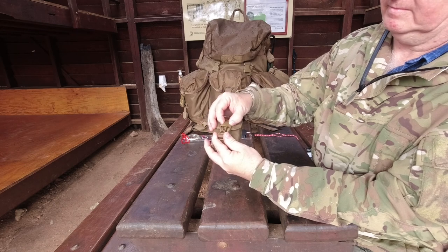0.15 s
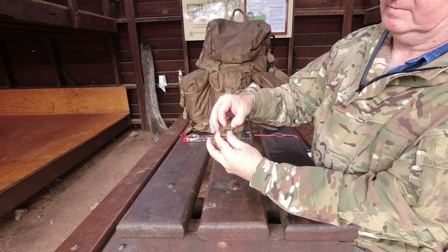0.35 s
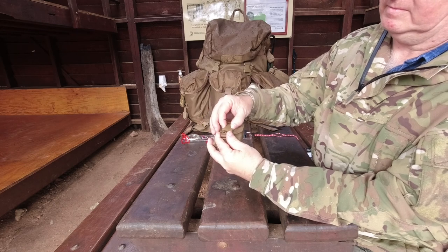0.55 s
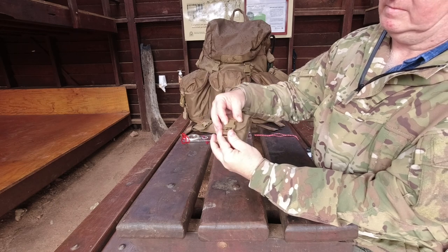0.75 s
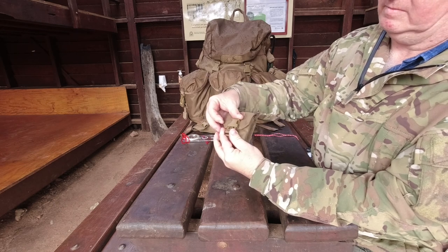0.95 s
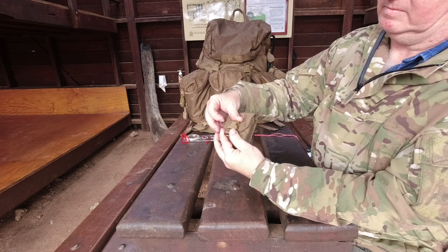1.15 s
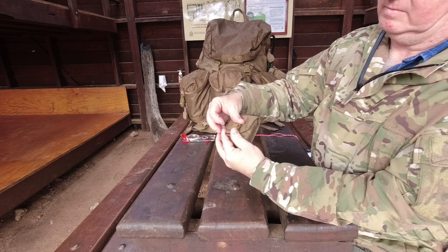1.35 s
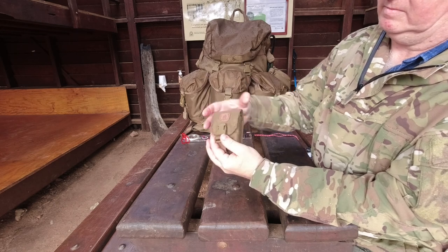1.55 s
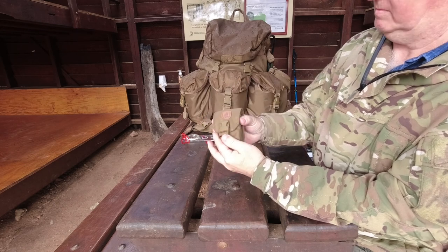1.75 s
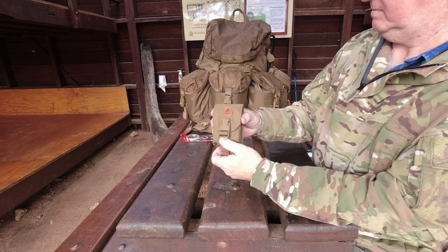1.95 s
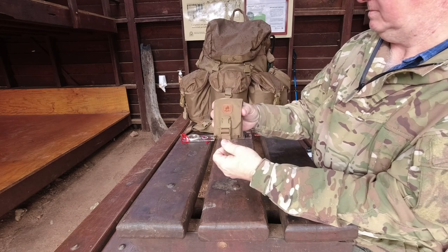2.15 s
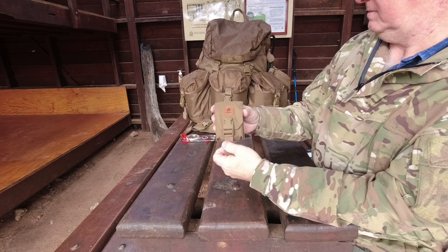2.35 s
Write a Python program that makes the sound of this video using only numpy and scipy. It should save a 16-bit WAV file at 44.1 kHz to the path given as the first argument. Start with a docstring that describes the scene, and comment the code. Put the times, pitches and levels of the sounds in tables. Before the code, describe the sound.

A plastic buckle snaps shut with one loud sharp click after soft nylon rustling and small ticks

```python
"""Hands fold the flap of a nylon pouch over a table in a small wooden shelter, over low outdoor rumble and faint air.
From the start the cloth rubs in short strokes (dense grains); in the first half second plastic buckle halves tick
(ring, knock, rattle) and fingers bump the padded pouch (damped noise). One more tick comes near 1.1 s. Near 1.4 s
the buckle snaps shut (modes on a crack) and the plank walls ring (fading noise). Fainter strokes follow, with two
ticks and a bump near 2.3 s."""
import sys
import numpy as np
from scipy import signal
from scipy.fft import rfft, irfft, next_fast_len
from scipy.io import wavfile
from scipy.ndimage import uniform_filter1d

SR = 44100
rng = np.random.default_rng(int(sys.argv[2]) if len(sys.argv) > 2 else 0)


def generate_wav(signal):
    """Clip the signal to [-1, 1] and save it as 16-bit WAV at the path in sys.argv[1]."""
    frames = np.transpose(np.atleast_2d(signal))
    scaled = np.clip(frames, -1, 1) * 32767
    pcm = np.round(scaled).astype(np.int16)
    wavfile.write(sys.argv[1], SR, pcm)


N = 105795


def undb(db):
    """Decibels to amplitude gain."""
    return 10 ** (np.asarray(db) / 20)


def unit(x):
    """Scale to an energy of one."""
    return x / np.sqrt(np.sum(x ** 2, axis=-1, keepdims=True))


def stereo(mid, side, side_db):
    """Mid plus side, the side with opposite sign at each ear."""
    return mid + undb(side_db) * side * np.array([[1], [-1]])


def colour(x, points):
    """Causal minimum-phase filter through (frequency [Hz], gain [dB]) points."""
    size = 2 * next_fast_len(N)
    hz, db = np.array(points, float).T
    log_hz = np.log(np.fft.rfftfreq(size, 1 / SR) + 1)
    cepstrum = irfft(np.interp(log_hz, np.log(hz), np.log(undb(db))))
    # fold the cepstrum onto positive time
    cepstrum[1:size // 2] *= 2
    cepstrum[size // 2 + 1:] = 0
    return irfft(rfft(x, size) * np.exp(rfft(cepstrum)))[..., :N]


def fade(t60_s):
    """Exponential decay, 60 dB down after t60_s."""
    return np.exp(-np.minimum(np.log(1000) * np.arange(N) / SR / t60_s, 60))


def ring(hz, t60_s):
    """One struck mode: a decaying cosine."""
    return np.cos(2 * np.pi * hz * np.arange(N) / SR) * fade(t60_s)


def at(x, time_s):
    """Delay a sound to its moment."""
    return np.concatenate([np.zeros(max(int(time_s * SR), 0)), x])[:N]


def wander(size, count):
    """Smooth random values of spread one, new about every count steps."""
    return uniform_filter1d(rng.standard_normal(size), count) * np.sqrt(count)


def burst(envelope):
    """Rattle of micro-contacts: enveloped noise, spectrum evened out, then shaped again."""
    x = rng.standard_normal(N) * envelope
    spectrum = rfft(x)
    magnitude = np.abs(spectrum)
    even = irfft(spectrum / (magnitude + .3 * magnitude.mean()), N)
    return unit(even * envelope ** .25)


def noise(points, side_db):
    """Coloured stereo noise, mid and side each of rms one before side_db."""
    mid, side = unit(colour(rng.standard_normal((2, N)), points)) * np.sqrt(N)
    return stereo(mid, side, side_db)


def cut_treble(x):
    """Steep low-pass near 5.1 kHz, plus a faint skirt of treble up to about 6.3 kHz."""
    edge = signal.butter(20, 5120, fs=SR, output="sos")
    skirt = signal.butter(5, 6300, fs=SR, output="sos")
    return signal.sosfilt(edge, x) + undb(-25.5) * signal.sosfilt(skirt, x)


# spectrum of the outdoor air: (frequency [Hz], relative level [dB])
AIR_SPECTRUM = [(200, 9), (400, 7), (800, 4), (1700, -3.5), (5400, -8.5), (7000, -16.5), (9000, -27.5),
                (15000, -36)]
# spectrum of the outdoor rumble: (frequency [Hz], relative level [dB])
RUMBLE_SPECTRUM = [(15, -1), (30, -5), (50, 2.5), (80, 1), (125, 0), (170, -5), (240, -18), (400, -20),
                   (900, -68)]
# course of the rumble: (time [s], level [dB])
RUMBLE_COURSE = [(0, -61.5), (.45, -58), (.9, -59), (1.35, -62.5), (1.85, -68), (2.099, -72), (2.35, -67.5)]
AIR_DB = -78.5


def background():
    """Low rumble noise of changing level, and faint steady air noise."""
    rumble_db = np.interp(np.arange(N) / SR, *np.array(RUMBLE_COURSE).T)
    rumble = undb(rumble_db) * noise(RUMBLE_SPECTRUM, side_db=-15.5)
    return rumble + undb(AIR_DB) * noise(AIR_SPECTRUM, side_db=-3)


# strokes of nylon on nylon: (peak time [s], rise to peak from 1/e [s], fall to 1/e [s], swish level [dB],
# dull rub re swish [dB], thin scrape re swish [dB])
CLOTH_STROKES = [(0.017, 0.086, 0.06, -63.5, -3, -6), (.18, 0.036, 0.037, -64, -2, -4.5),
                 (.228, 0.03, 0.02, -60.5, 2, -3.5), (0.469, 0.028, 0.017, -65.5, 0.5, 7.5),
                 (0.661, 0.025, 0.023, -65, -4, 1.5), (.79, 0.14, 0.13, -63.5, -8, -19),
                 (0.911, 0.038, 0.043, -60, -8.5, -9), (1.03, 0.047, 0.072, -62, -14.5, -9.5),
                 (1.094, 0.015, 0.029, -59.5, -11, -9.5), (1.203, 0.033, 0.035, -59.5, -13.5, -5.5),
                 (1.298, 0.031, 0.25, -74, -7, 1.5), (1.819, 0.03, 0.088, -75, -6, -5),
                 (1.94, 0.026, 0.029, -76.5, -3, -1.5), (2.169, 0.021, 0.024, -73, -12, -1),
                 (2.227, 0.024, 0.026, -67.5, -10, -8.5), (2.292, 0.033, 0.033, -67.5, -7, -4)]
# spectra of swish, rub and scrape before cut_treble(): (frequency [Hz], relative level [dB])
SWISH_SPECTRUM = [(200, -6), (800, -15), (1500, -7.5), (1850, 4), (2300, 4), (3300, -0.5), (5000, -7.5),
                  (8000, -10.5)]
RUB_SPECTRUM = [(100, -5.5), (220, -1), (420, 2), (750, 4), (1100, -1.5), (1500, 3), (2500, -15.5)]
SCRAPE_SPECTRUM = [(1500, -33), (2900, -9.5), (3600, -1.5), (4900, -6.5), (6500, -10.5)]
GRAINS_PER_S, GRAIN_SPREAD_DB = 2700, -1
CATCHES_PER_S, CATCH_DB = 160, 1.6


def cloth():
    """Threads catch and slip in dense tiny grains; each stroke swells and dies with its own mix."""
    t = np.arange(N) / SR
    powers = []
    for peak_s, rise_s, fall_s, db, _, _ in CLOTH_STROKES:
        width_s = np.where(t < peak_s, rise_s, fall_s)
        powers.append(undb(db) ** 2 * np.exp(-2 * ((t - peak_s) / width_s) ** 2))
    powers = np.array(powers)
    shares = undb([(0, rub_db, scrape_db) for *_, rub_db, scrape_db in CLOTH_STROKES]).T
    out = 0
    for share, spectrum in zip(shares, (SWISH_SPECTRUM, RUB_SPECTRUM, SCRAPE_SPECTRUM)):
        struck = rng.random(N) < GRAINS_PER_S / SR
        sign = rng.choice([-1, 1], N)
        size = undb(GRAIN_SPREAD_DB * np.minimum(rng.exponential(size=N), 5))
        texture = unit(cut_treble(colour(struck * sign * size, spectrum)))
        out = out + np.sqrt(share ** 2 @ powers * N) * texture
    catches = uniform_filter1d(wander(N, int(SR / CATCHES_PER_S)), size=64)
    return out * undb(CATCH_DB * catches)


def near(x, side_db):
    """Direct sound, its scatter off hands and table, and one thin, slightly smeared echo."""
    # burst() reshapes both fades
    scatter = signal.fftconvolve(x, at(burst(fade(0.0072)), .0006))[:N]
    echo = signal.fftconvolve(x, at(burst(fade(.003)), .0108))[:N]
    echo = signal.sosfilt(signal.butter(1, 1400, "high", fs=SR, output="sos"), echo)
    return stereo(x, scatter, side_db) + undb(-10.5) * echo


# bands of the plank walls: (frequency [Hz], decay t60 [s], relative level [dB])
WALL_BANDS = [(150, .3, -10), (500, 0.41, -5.5), (1400, 0.38, 1), (2610, .39, -3.5), (3750, 0.3, -3.5),
              (4600, .33, 0.5), (5390, 0.35, 1), (7700, 0.31, 7), (9300, .28, 4.5), (10700, 0.25, -3),
              (15000, 0.28, -3)]
WALL_DELAY_S, BUILD_S, PATCHY_DB = 0.0045, 0.028, 2


def shelter(side_db=-3.0):
    """Plank reflections thicken, then die band by band, unevenly over pitch and differently at each ear."""
    t = np.arange(N) / SR
    log_hz = np.log(np.fft.rfftfreq(N, 1 / SR) + 1)
    spectrum = rfft(rng.standard_normal((2, N))) * undb(PATCHY_DB * wander(len(log_hz), count=200))
    centres = np.log([row[0] for row in WALL_BANDS])
    tail = 0
    # each unit vector gives one triangular band
    for (_, t60_s, db), band in zip(WALL_BANDS, np.eye(len(WALL_BANDS))):
        banded = irfft(spectrum * np.interp(log_hz, centres, band), N)
        tail = tail + undb(db) * fade(t60_s) * banded
    mid, side = tail * np.sqrt(np.clip((t - WALL_DELAY_S) / BUILD_S, 0, 1))
    return unit(stereo(mid, side, side_db))


def place(x, walls, wet_db, side_db):
    """Close sound plus the shelter's ring by convolution."""
    wet = signal.fftconvolve(x[None], walls, axes=1)[:, :N]
    return near(x, side_db) + undb(wet_db) * wet


# buckle halves touching, before cut_treble(): (time [s], ring level [dB], ring frequency [Hz], ring t60 [s],
# dull knock re ring [dB], bright rattle re ring [dB])
BUCKLE_TICKS = [(0.0395, -33, 3500, 0.0053, -2, -10), (0.211, -31, 4380, 0.005, -0.5, -5),
                (.2168, -35, 3600, 0.0072, 8, -4), (.2266, -21, 3470, 0.0076, -11, -13),
                (.2285, -18, 3484, 0.022, -4, -11.5), (0.23, -24, 3460, 0.018, -9.5, -12),
                (.2375, -33.5, 3570, 0.013, -11, -12), (.271, -35, 3506, 0.062, -24, -21),
                (0.4341, -31, 3960, 0.0081, -20, -0.5), (0.455, -32, 3870, 0.005, -13, 5),
                (.459, -27, 3700, 0.0071, -14, -6), (0.4624, -21, 3740, 0.01, -17, -12),
                (0.4734, -24, 3600, 0.013, -11, -7), (1.0881, -34, 4313, 0.0082, -4.5, -5),
                (2.226, -34, 2200, 0.007, -2.5, -10), (2.2275, -33, 2600, .007, -5.5, -9)]
# spectrum of the dull knock: (frequency [Hz], gain [dB])
KNOCK_SPECTRUM = [(100, -9), (400, 5.5), (900, -5.5), (1900, 9.5), (3000, -4.5), (4900, -8), (7000, -9.5)]
# spectrum of the bright rattle: (frequency [Hz], relative level [dB])
RATTLE_SPECTRUM = [(1500, -23), (2900, -9), (3800, 0), (4600, 3), (5400, -4.5), (7000, -6)]


def ticks():
    """Light plastic contacts: one ring that depends on the grip, a dull knock and a bright rattle."""
    contact_fade = fade(0.0078)  # reshaped by burst()
    rings, knocks, rattles = 0, 0, 0
    for time_s, db, hz, t60_s, knock_db, rattle_db in BUCKLE_TICKS:
        rings = rings + undb(db) * at(unit(ring(hz, t60_s)), time_s)
        knocks = knocks + undb(db + knock_db) * at(burst(contact_fade), time_s)
        rattle = unit(colour(burst(contact_fade), RATTLE_SPECTRUM))
        rattles = rattles + undb(db + rattle_db) * at(rattle, time_s)
    return cut_treble(rings + colour(knocks, KNOCK_SPECTRUM) + rattles)


# fingers bumping the padded pouch: (time [s], level [dB], centre frequency [Hz])
POUCH_BUMPS = [(0.228, -34.5, 414), (0.436, -36, 724), (.456, -31, 697), (.474, -31, 677),
               (0.487, -37, 340), (2.309, -40, 419)]
BUMP_T60_S, BUMP_WIDTH = .11, .45


def bumps():
    """Damped thuds of the pouch body: fading noise through a twice-applied band-pass."""
    out = 0
    edge = 1 + BUMP_WIDTH / 2
    for time_s, db, hz in POUCH_BUMPS:
        body = signal.butter(1, [hz / edge, hz * edge], "band", fs=SR, output="sos")
        blow = rng.standard_normal(N) * fade(BUMP_T60_S)
        thud = unit(signal.sosfilt(np.vstack([body, body]), blow))
        out = out + undb(db) * at(thud, time_s)
    return out


# modes of the closing buckle: (frequency [Hz], relative level [dB], t60 [s])
BUCKLE_MODES = [(1300, -8, 0.0052), (3782, 5.5, 0.012), (4880, 3, 0.008), (5390, 1, 0.0076),
                (6240, -11, 0.013), (7920, -12.5, 0.011), (10540, 1, 0.009)]
# spectrum of its crack: (frequency [Hz], relative level [dB])
CRACK_SPECTRUM = [(100, -5.5), (400, -4), (1100, -5), (2000, -2.5), (3000, -3), (4400, 2), (5400, 3),
                  (7000, -4.5), (8700, -3.5), (9800, 6), (11200, 6), (12500, 1), (15500, -1)]
RING_DB, CRACK_DB = 0, -2.5


def buckle(x):
    """The buckle's answer to a blow: short plastic modes standing on a broad crack."""
    hz = np.fft.rfftfreq(N, 1 / SR) + 1
    mode_power = 0
    for mode_hz, db, t60_s in BUCKLE_MODES:
        half_width_hz = np.log(1000) / (2 * np.pi * t60_s)
        mode_power = mode_power + undb(db) ** 2 / t60_s / ((hz - mode_hz) ** 2 + half_width_hz ** 2)
    crack_hz, crack_db = np.array(CRACK_SPECTRUM).T
    crack = undb(np.interp(np.log(hz), np.log(crack_hz), crack_db))
    gain = np.hypot(undb(RING_DB) * unit(np.sqrt(mode_power)), undb(CRACK_DB) * unit(crack))
    gain = gain * np.sqrt(len(hz))
    return colour(x, np.column_stack([hz, 20 * np.log10(gain)]))


# latch and its rebounds: (time [s], relative level [dB])
LATCH_CONTACTS = [(1.3789, 2), (1.3795, 4.5), (1.3804, 2), (1.381, -1.5)]


def snap(walls, wet_db):
    """The prongs spring into the socket and rebound; the walls answer the cluster as one blow."""
    contact_fade = fade(0.0069)  # reshaped by burst()
    power = sum(at(undb(db) * contact_fade, time_s) ** 2 for time_s, db in LATCH_CONTACTS)
    contacts = burst(np.sqrt(power))
    room = np.array([at(ear, LATCH_CONTACTS[0][0]) for ear in walls])
    return buckle(near(contacts, side_db=-6.5) + undb(wet_db) * room)


def scene():
    """Background, cloth, ticks, bumps and snap in the shelter."""
    walls = shelter()
    rubbing = place(cloth(), walls, wet_db=-7, side_db=-10.5)
    touches = place(ticks() + bumps(), walls, wet_db=-10.5, side_db=-18)
    return background() + rubbing + touches + snap(walls, wet_db=0)


def record(dry):
    """Steep elliptic low-pass at 15650 Hz cuts the top."""
    return signal.sosfilt(signal.ellip(10, .2, 80, 15650, fs=SR, output="sos"), dry)


dry = scene()
out = record(dry)
generate_wav(out)
```